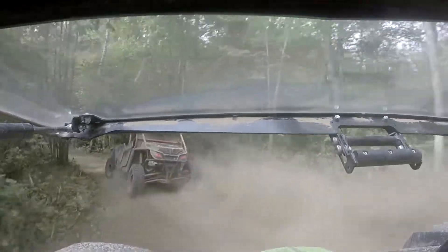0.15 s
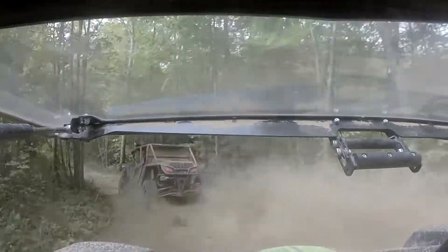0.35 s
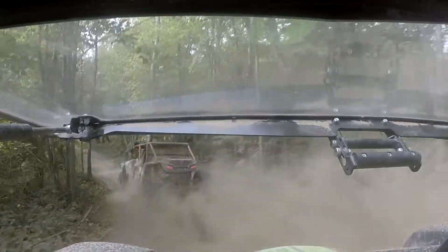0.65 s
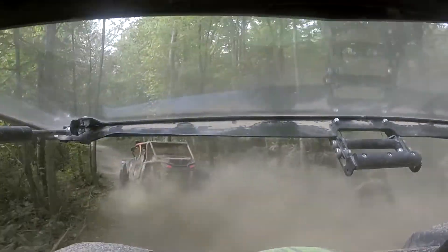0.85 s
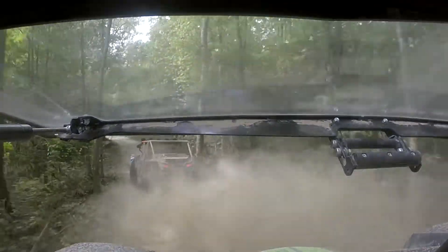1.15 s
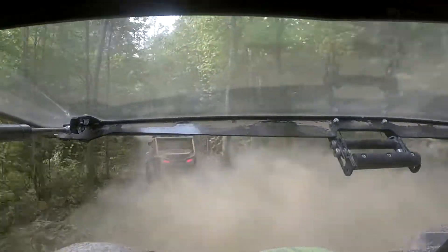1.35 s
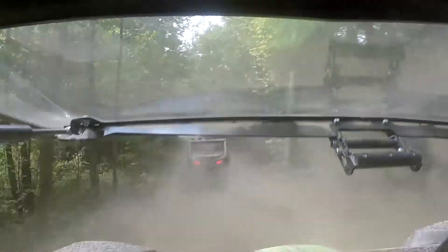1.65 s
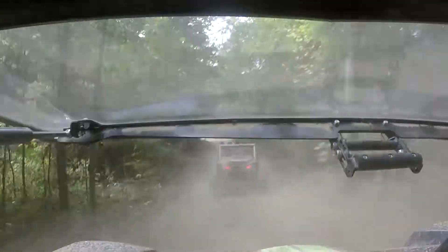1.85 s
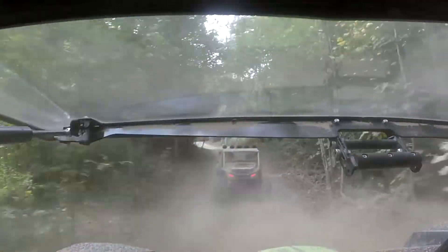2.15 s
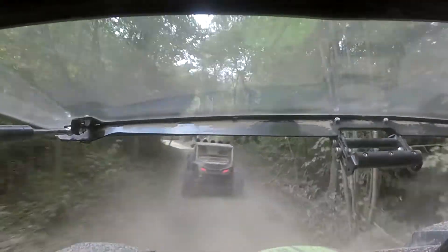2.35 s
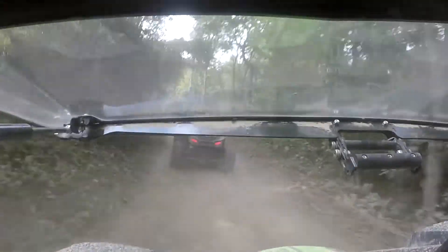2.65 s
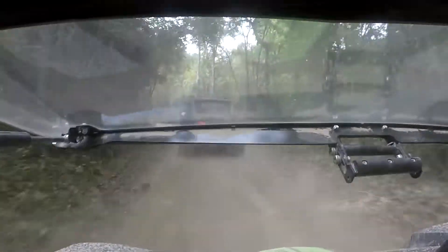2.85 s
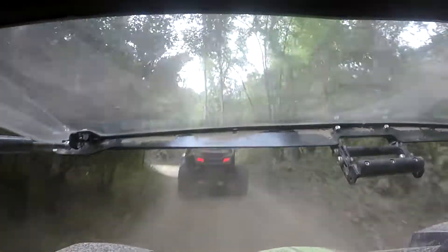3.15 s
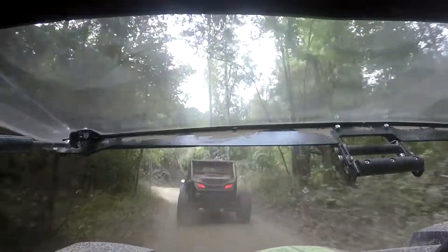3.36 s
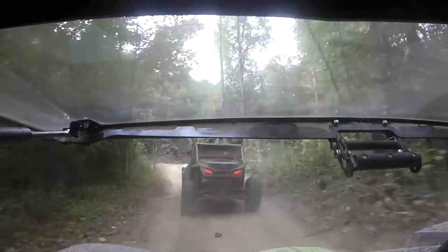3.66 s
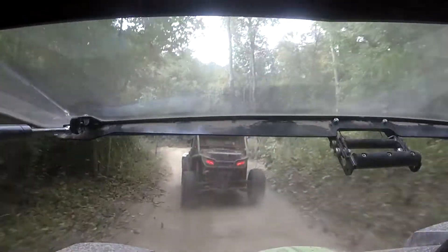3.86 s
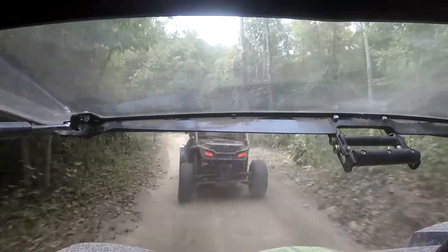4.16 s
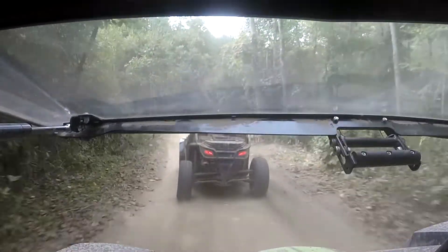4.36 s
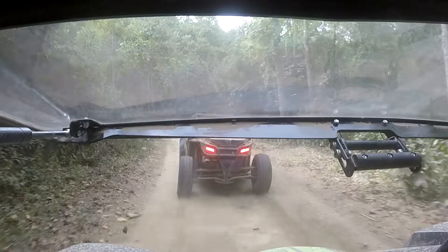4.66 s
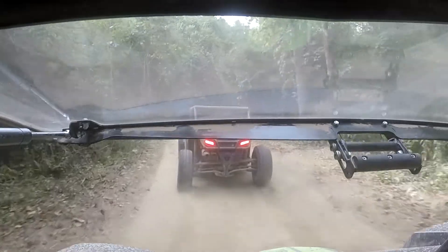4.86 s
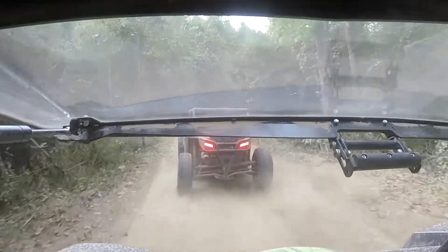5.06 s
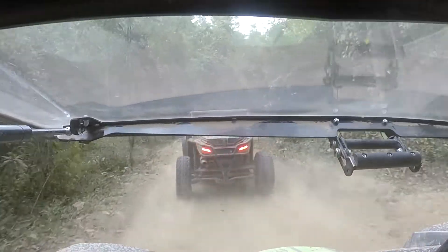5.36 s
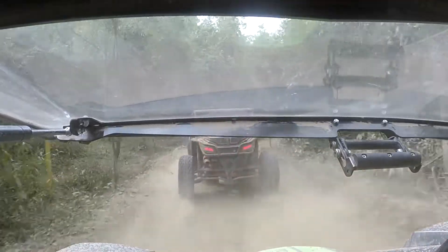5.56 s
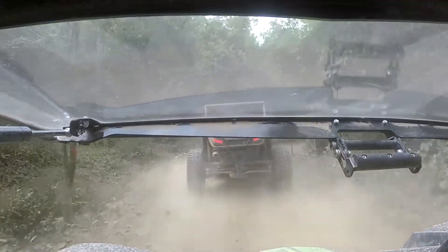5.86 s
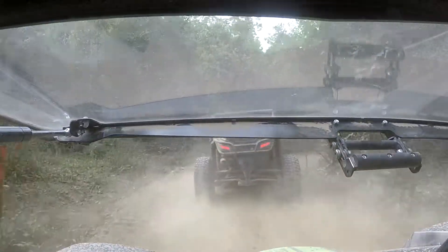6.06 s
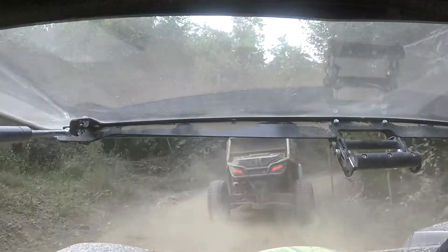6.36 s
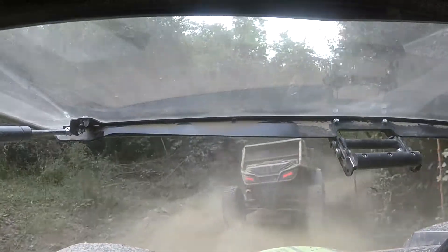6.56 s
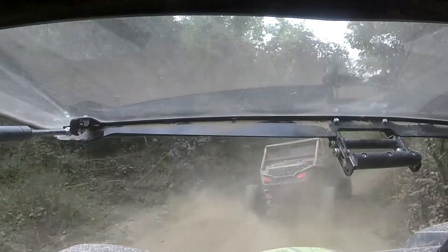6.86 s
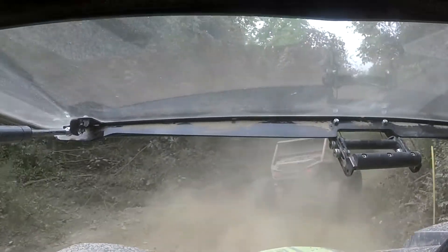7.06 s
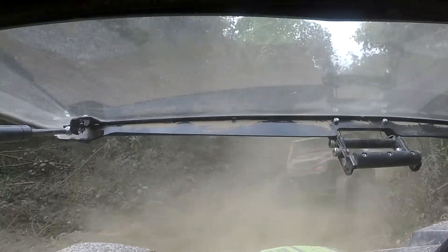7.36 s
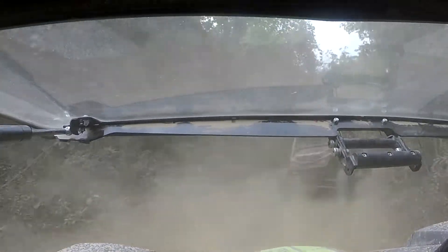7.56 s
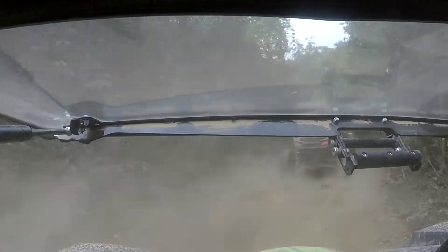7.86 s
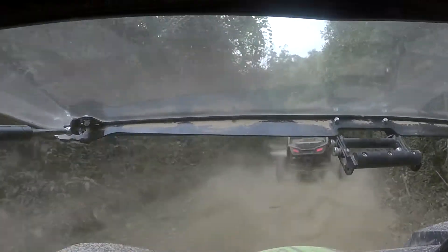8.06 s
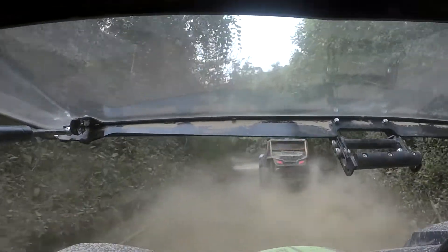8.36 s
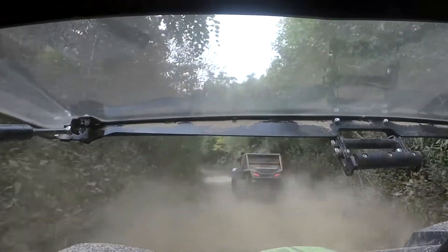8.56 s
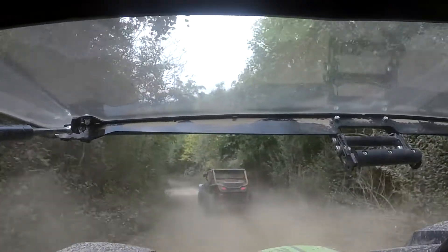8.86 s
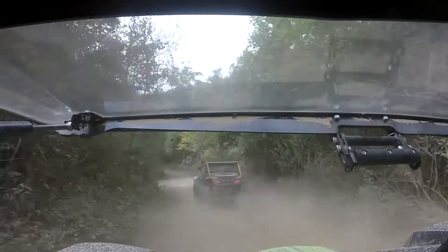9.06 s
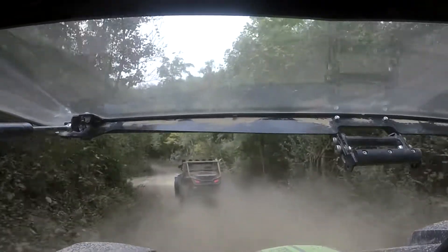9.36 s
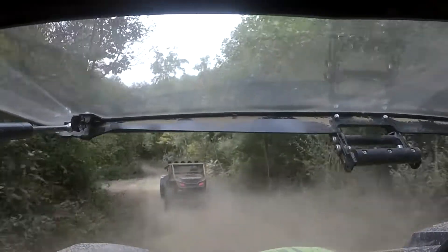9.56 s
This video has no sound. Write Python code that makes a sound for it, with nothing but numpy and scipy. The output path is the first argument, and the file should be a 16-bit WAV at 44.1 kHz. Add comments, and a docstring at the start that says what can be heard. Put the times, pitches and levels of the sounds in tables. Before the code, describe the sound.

Inside the hard, resonant cab of a side-by-side buggy on a rutted dirt trail. At first the twin engine growls unevenly, with the rasping exhaust of a buggy ahead fading after about 1.3 seconds. From 1.4 the engine climbs to a strong booming bark near 2 seconds, a loose fitting buzzing. At 2.6 the throttle shuts; revs fall and hard panel knocks clatter around 2.8. A short burst of revs peaks near 3.4, then sinks, with creaky chirps from 3.7 to 5.5 and heavier knocks at 4.3 and 4.5. The engine coasts to a lumpy, quiet low near 6.8. The leader rasps again from about 6.8 to 8.2, with a knock near 7.1; the engine recovers unevenly from 7, then pulls hard from 8.5, booming and buzzing to the end. Tyre crunch, belt whirr, low drone, bump thuds, latch clinks, stone ticks and rattles continue around it.

```python
"""Chasing a buggy along a dirt trail

Heard in a side-by-side buggy: two spells of hard throttle, with uneven throttle and a coast between.
Crank orders make the twin's boom and bark and the rasp of the buggy ahead; filtered noise makes the tyres
and belt drive. A low drone and thuds follow the bumps. Decaying noise bursts excite panels (knocks), a latch
(clinks) and hard trim (grit); loose parts ring as decaying sines, dry joints squeak as wavering ones, and
a fitting buzzes turn by turn. Cab resonances shape most of the broad sounds.
"""
import sys
import numpy as np
from scipy import signal
from scipy.fft import rfft, irfft
from scipy.io import wavfile
from scipy.ndimage import uniform_filter1d, minimum_filter1d

SR = 44100
rng = np.random.default_rng(int(sys.argv[2]) if len(sys.argv) > 2 else 0)


def bounce(signal):
    """Save signal as a 16-bit WAV file at the path given by the first command-line argument."""
    frames = np.transpose(np.atleast_2d(signal))
    limited = np.clip(frames, -1, 1)
    pcm = np.round(limited * 32767).astype(np.int16)
    wavfile.write(sys.argv[1], SR, pcm)


N = 427769
TIME = np.arange(N) / SR  # s
FREQ = np.arange(N // 2 + 1) * SR / N  # Hz

# Running noise. Each row: time in seconds, relative level of tyres on dirt in dB, of belt whirr in dB.
RUNNING_NOISE = [(0, -24.5, -42), (.8, -24.5, -42.5), (1.45, -23, -41), (2.3, -25, -42), (3.05, -27, -50.5),
                 (3.25, -21.5, -43), (3.85, -25, -45.5), (4.5, -28.5, -46.5), (5.2, -28, -49),
                 (6, -33, -49), (6.45, -30, -52), (6.65, -29, -46.5), (7.2, -30, -42), (8.2, -25, -43.5),
                 (8.55, -22, -41.5), (9.7, -25, -41)]
# Own engine. Each row: time in seconds, crank speed in Hz.
CRANK_SPEED = [(0, 88), (.15, 100.9), (.48, 107.1), (.65, 105.6), (.78, 95.7), (1.05, 101.8), (1.2, 97.4),
               (1.42, 110.5), (1.5, 117.2), (1.65, 129), (1.88, 139.8), (2.1, 137.5), (2.22, 136.1),
               (2.45, 129.6), (2.57, 135.5), (2.7, 106.9), (2.95, 97.8), (3.15, 111.5), (3.42, 117.9),
               (3.53, 105.1), (3.62, 100.9), (3.85, 93.3), (4.5, 78.25), (4.9, 72.3), (5.2, 70.28),
               (5.6, 65.92), (6.3, 60.26), (6.85, 53.55), (7.05, 57), (7.3, 72.85), (7.42, 78),
               (7.65, 84.36), (7.78, 78.04), (8, 98.54), (8.3, 101.9), (8.5, 116.9), (8.67, 129.9),
               (8.8, 134), (9.27, 138.2), (9.5, 135.8), (9.7, 136.3)]
# Spectrum of small hard impacts. Each row: frequency in Hz, relative gain in dB.
TICK_SPECTRUM = [(1000, -19.5), (3000, 10), (5000, 0.5), (6500, -1.5), (8300, -1.5), (10500, -8),
                 (12000, -16), (13500, -10), (14500, -22.5)]


def undb(db):
    """Level to amplitude ratio: 20 dB is a factor of ten."""
    return 10 ** (np.asarray(db) / 20)


def unit(x):
    """Normalisation to a root-mean-square of 1."""
    return x / np.sqrt(np.mean(x ** 2))


def steady(x):
    """Automatic gain: the short-term rms is held at 1 over an eighth of a second."""
    return x / np.sqrt(uniform_filter1d(x ** 2, SR // 8) + 1e-12)


def curves(table):
    """Linear interpolation of each column of a time table, sample by sample."""
    s, *columns = np.transpose(table)
    return [np.interp(TIME, s, column) for column in columns]


def slope(points):
    """Spectral envelope: gain through (Hz, dB) points on a log axis, falling steeply past both ends."""
    hz, db = np.transpose(points)
    below, above = (FREQ + 1) / hz[0], hz[-1] / (FREQ + 1)
    ends = np.minimum(1, np.minimum(below, above)) ** 4
    return undb(np.interp(np.log(FREQ + 1), np.log(hz), db)) * ends + 1e-7


def colour(x, gain):
    """Minimum-phase filtering: folding the cepstrum makes a causal response with the given gain."""
    size = 16384
    grid_hz = np.arange(size // 2 + 1) * SR / size
    cepstrum = irfft(np.log(np.interp(grid_hz, FREQ, gain)))
    cepstrum[1:size // 2] *= 2
    cepstrum[size // 2 + 1:] = 0
    response = irfft(np.exp(rfft(cepstrum)))
    return signal.fftconvolve(x, response)[:N]


def walk(rate):
    """Band-limited fluctuation of rms 1, drawn anew `rate` times a second and interpolated."""
    steps = rng.standard_normal(8192)
    return unit(np.interp(TIME * rate, np.arange(len(steps)), steps))


def noise():
    """White noise: equal power at every frequency."""
    return rng.standard_normal(N)


def swell(s, length):
    """Gaussian envelope centred on s, with `length` its full width at half height."""
    return .5 ** ((2 * (TIME - s) / length) ** 2)


def blow(s, t60, rise):
    """Impact excitation: a noise burst that swells quickly and decays by 60 dB in t60 seconds."""
    burst, start = np.zeros(N), int(s * SR)
    age = TIME[:min(SR // 2, N - start)]
    shape = (1 - np.exp(-age / rise)) * undb(-60 * age / t60)
    burst[start:start + len(age)] = shape * rng.standard_normal(len(age))
    return burst


def cab_response():
    """Room resonance: air and panels of the cab lift some bands and cancel others."""
    # Each row: centre in Hz, width at half the dB in Hz, gain in dB (negative for a notch).
    resonances = [(80.8, 16, 4), (96.4, 14, 4), (144.35, 17.5, 14.5), (203, 6.9, -13), (232.4, 38.3, 9.5),
                  (298.6, 41.7, 11.5), (387.8, 53, 8.5), (650, 88, 17), (703, 89, -8.5), (909, 107, 4.5),
                  (1076, 96, 7), (1505, 276, -3), (1646, 200, 11), (2020, 145, -8), (2245, 180, 5),
                  (4598, 233, 10), (5270, 300, -5)]
    return undb(sum(db * .5 ** ((2 * (FREQ - hz) / width) ** 2) for hz, width, db in resonances))


def exhaust(turns, hz, response, half_db, flutter_db, count):
    """Order synthesis of a four-stroke twin: unequal firings add half orders, and every order flutters."""
    out = 0
    for order in np.arange(2, count + 1) / 2:
        order_db = half_db * (order % 1 > 0) + flutter_db * walk(22)
        gain = np.interp(order * hz, FREQ, response) * undb(order_db)
        # the low orders start in phase and add up to one pulse every two turns;
        # reflections scatter the phases of the high ones
        phase = rng.random() * (order > 3)
        out = out + gain * np.cos(2 * np.pi * (order * turns + phase))
    return out


def level_swells():
    """Amplitude modulation: short rises and dips in the level of bark and intake boom, in dB."""
    # Each row: centre in seconds, length in seconds, change of bark in dB, change of intake boom in dB.
    level_changes = [(0.134, 0.13, -10, 1.5), (0.806, 0.3, -1.5, 1), (1.302, 0.31, 4.5, -11.5),
                     (3.38, 0.18, 0, -2), (3.698, 0.19, -2, -5), (3.892, 0.2, 6, -10),
                     (4.66, 0.083, 4.5, 6.5), (4.866, 0.083, 3.5, 3), (6.202, 0.28, 3.5, -10),
                     (7.92, 0.085, 1, 2.5), (8.167, .18, -4, 10), (8.84, 0.24, 4, -1)]
    return sum(np.outer([bark_db, boom_db], swell(s, length)) for s, length, bark_db, boom_db in level_changes)


def engine(hz, throttle, cab):
    """Forced resonance: orders crossing the intake resonance boom; the exhaust barks, ragged at low revs."""
    # Each row: frequency in Hz, relative gain in dB.
    bark_spectrum = [(170, 2.5), (205, -3.5), (268, 8.5), (300, -4), (400, -3.5), (540, -9.5), (680, -28),
                     (1000, -18.5), (1350, -27), (1620, -19), (1850, -32), (2500, -57.5)]
    intake = slope([(60, -20.0), (95, -8.0), (128, 5.0), (148, 0.5), (175, -8.5), (260, -56.5)])
    cruise_hz = 100
    # relative boom at cruising revs and full throttle; change with throttle shut; change per octave of revs
    boom_base_db, boom_shut_db, boom_octave_db = -16.5, -26.5, -4
    # bark at low revs and full throttle; change with throttle shut; gain when revving hard
    bark_base_db, bark_shut_db, bark_revving_db = -24.5, -5.5, 7.5

    revving = np.clip((hz - 105) / 22, 0, 1)
    ragged = 1 - revving
    # at low revs the two cylinders pull unequally
    lumpy = np.clip((100 - hz) / 30, 0, 1)
    shut = 1 - throttle
    boom_db = boom_base_db + boom_shut_db * shut + boom_octave_db * np.log2(hz / cruise_hz)
    bark_db = bark_base_db + bark_shut_db * shut + bark_revving_db * revving * throttle

    jitter = (.001 + .001 * ragged) * walk(70) + .002 * ragged * walk(9)
    turns = np.cumsum(hz * (1 + jitter)) / SR
    boom = exhaust(turns, hz, intake, half_db=0.0, flutter_db=1.9 + 1.3 * ragged, count=6)
    bark = steady(exhaust(turns, hz, cab * slope(bark_spectrum), half_db=-13.5 + 7.9 * lumpy,
                          flutter_db=1.7 + 0.84 * ragged, count=36))

    # no two firings are equally strong
    strength = undb(.6 * ragged * walk(110))
    bark_swell_db, boom_swell_db = level_swells()
    boom = boom * undb(boom_db + boom_swell_db)
    bark = bark * undb(bark_db + bark_swell_db)
    return strength * (boom + bark), turns


def buggy_ahead(cab):
    """Harmonic radiation: the leader's exhaust orders rasp back along the trail as it pulls away."""
    # Each row: time in seconds, crank speed in Hz.
    leader_speed = [(0, 103.5), (.26, 103.9), (.39, 105.9), (.5, 105.4), (.78, 107), (.95, 104.3),
                    (1.12, 106.2), (1.25, 103.4), (1.8, 108.1), (6.45, 78.02), (6.6, 83.06), (6.75, 90.3),
                    (6.9, 94), (7.1, 94.46), (7.22, 97.6), (7.42, 96.65), (7.57, 98.8), (7.72, 95.5),
                    (7.82, 98.5), (7.93, 95.7), (8.8, 103.1)]
    # Each row: start of pulling away in seconds, end in seconds.
    pulls = [(0, 1.28), (6.88, 8.12)]
    # Each row: frequency in Hz, relative gain in dB.
    pipe_spectrum = [(280, -9.5), (345, 5.5), (400, 3), (520, 5.5), (650, -4), (780, -4.5), (845, 7.5),
                     (880, 1.5), (925, 8.5), (1060, -4), (1250, 2), (1370, 8), (1520, -9), (1650, -25.5),
                     (2500, -35)]
    level_db, rise_db_per_s, fall_db_per_s = -30.5, 31.5, 29

    hz, = curves(leader_speed)
    pulling = 0
    for start, end in pulls:
        before, after = np.maximum(start - TIME, 0), np.maximum(TIME - end, 0)
        pulling = pulling + undb(-rise_db_per_s * before - fall_db_per_s * after)
    turns = np.cumsum(hz * (1 + .001 * walk(50))) / SR
    pipe = exhaust(turns, hz, cab * slope(pipe_spectrum), half_db=-3.0, flutter_db=2.1, count=36)
    uneven = undb(.7 * walk(100) + 1.1 * walk(12))
    return steady(pipe) * uneven * pulling * undb(level_db)


def jolt(s, t60):
    """Transient response to a bump: it builds as the wheel climbs, then decays exponentially."""
    rise_s = 0.08
    climb = np.clip(1 + (TIME - s) / rise_s, 0, 1)
    return climb * undb(-60 * np.maximum(TIME - s, 0) / t60)


def ride():
    """Power summation: steady shaking from the ruts and a jolt per bump set body heave and tyre thud."""
    # Each row: time in seconds, mean level of the steady shaking in dB.
    ruts = [(0, -25), (1.25, -19.5), (1.7, -27.5), (2.2, -25.5), (2.7, -22.5), (4.3, -22.5), (4.8, -21),
            (6.2, -21.5), (6.5, -21), (8.3, -25), (8.7, -25.5), (9.7, -25.5)]
    # Each row: time in seconds, level of body heave in dB, of tyre thud in dB.
    bumps = [(.13, -11.5, -14.5), (.27, -10.5, -32), (.6, -9, -25), (.78, -17, -17.5), (1.16, -14.5, -23),
             (1.5, -9, -33), (1.68, -12, -37), (2.48, -12.5, -24), (2.88, -17, -27), (3.24, -15.5, -32),
             (3.52, -13, -35), (3.73, -14, -14), (4.28, -13.5, -16), (4.54, -30, -17), (6.96, -21, -35),
             (7.07, -28, -13.5), (7.32, -25, -20), (7.62, -14.5, -29), (8.2, -15, -19.5),
             (8.4, -9.5, -17.5), (9.38, -16, -31), (9.6, -14, -33)]
    heave_t60_s, thud_t60_s = 1.7, 0.56

    ruts_db, = curves(ruts)
    heave = undb(ruts_db - 3 * walk(3.6))
    thud = undb(ruts_db + 0.5 * walk(19))
    for s, heave_db, thud_db in bumps:
        heave = np.hypot(heave, undb(heave_db) * jolt(s, heave_t60_s))
        thud = np.hypot(thud, undb(thud_db) * jolt(s, thud_t60_s))
    return heave, thud


def trail(cab):
    """Rolling excitation: the body drones at its lowest resonance; tyres thud over ruts and crunch dirt."""
    # Spectra. Each row: frequency in Hz, relative gain in dB.
    heave_spectrum = [(15, -28), (24, -7), (33, 24.5), (44, 23.5), (56, -4), (90, -34)]
    thud_spectrum = [(40, -16.5), (60, 1), (85, 1.5), (120, -10), (170, -10.5), (260, -20)]
    dirt_spectrum = [(100, -22), (150, 6.5), (300, 1), (500, 3), (650, -9.5), (800, -3.5), (1100, -6.5),
                     (1500, -14), (2300, -16.5), (3200, -28.5), (6000, -47)]

    heaving, thudding = ride()
    dirt_db, _ = curves(RUNNING_NOISE)
    body_hz = 31 + 2.83 * walk(14)
    drone = np.sin(2 * np.pi * np.cumsum(body_hz) / SR)
    rumble = unit(colour(noise(), slope(heave_spectrum)))
    heave = steady(drone + .5 * rumble) * heaving
    thud = steady(colour(noise(), cab * slope(thud_spectrum))) * thudding
    grains = noise() * undb(2.3 * walk(25) + 0.5 * walk(260))
    crunch = unit(colour(grains, cab * slope(dirt_spectrum))) * undb(dirt_db + 1.33)
    return heave + thud + crunch


def belt_drive(turns, cab):
    """Amplitude modulation: belt, gears and valves whirr as noise pulsing with each turn of the crank."""
    # Each row: frequency in Hz, relative gain in dB.
    whirr_spectrum = [(600, 7.5), (900, 10.5), (1600, 9), (2400, 4), (3100, 2), (4100, -6.5), (6300, -10),
                      (8300, -15.5), (10000, -24.5), (11500, -32), (14000, -41)]
    _, whirr_db = curves(RUNNING_NOISE)
    rub = noise() * (1 + 0.17 * np.cos(2 * np.pi * turns)) * undb(1.13 * walk(35))
    # reflections between the hard panels ripple the treble, here by random gains 90 Hz apart
    ripple_db = 1.8 * np.interp(FREQ, np.arange(256) * 90, rng.standard_normal(256))
    ripple = undb(ripple_db * (FREQ > 2500))
    return unit(colour(rub, cab * ripple * slope(whirr_spectrum))) * undb(whirr_db + 7)


def rattles():
    """Free vibration: tapped loose parts ring and decay, louder with tyre noise and near a critical speed."""
    # Each row: pitch in Hz, 60 dB decay time in seconds, relative level in dB.
    parts = [(609, 0.064, -10.5), (657.4, 0.078, -10), (1082, .04, -13.5), (1670, 0.047, -14)]
    taps_per_s, detune_share, scatter_db, fits_db = 55, 0.029, 2.8, 1.5
    # crank speed that shakes the parts most, width of that resonance, gain at its centre
    shake_hz, shake_width_hz, shake_db = 120.4, 12, 3.3

    dirt_db, _ = curves(RUNNING_NOISE)
    revs, = curves(CRANK_SPEED)
    drive_db = dirt_db + shake_db * .5 ** ((2 * (revs - shake_hz) / shake_width_hz) ** 2)
    age, out = TIME[:SR // 16], 0
    for hz, t60, db in parts:
        part = np.zeros(N + len(age))
        starts = rng.integers(0, N, int(taps_per_s * N / SR))
        for start in starts:
            detune, size = rng.standard_normal(2)
            ring = np.sin(2 * np.pi * hz * (1 + detune_share * detune) * age)
            part[start:start + len(age)] += ring * undb(scatter_db * size - 60 * age / t60)
        out = out + unit(part[:N] * undb(fits_db * walk(9))) * undb(db)
    return out * undb(drive_db - 4.5)


def squeaks():
    """Stick-slip friction: dry joints chirp or creak at a fluctuating pitch as the frame twists."""
    # Each row: centre in seconds, pitch in Hz, mean level in dB, length in seconds, rms pitch scatter in Hz.
    stick_slips = [(0.176, 2120, -37, 0.036, 40), (2.647, 2150, -34, 0.011, 70),
                   (2.71, 2290, -43, 0.11, 80), (2.914, 2290, -39, 0.078, 90),
                   (3.116, 2290, -37, .015, 132), (3.142, 6950, -47, 0.021, 70),
                   (3.683, 9460, -47, 0.036, 70), (3.72, 1140, -26.5, 0.04, 35),
                   (3.788, 1185, -28, 0.053, 35.3), (3.897, 1087, -27, 0.063, 34.97),
                   (4.24, 1120, -29, .03, 35), (4.273, 2350, -34, 0.036, 169),
                   (4.482, 2330, -32, 0.018, 81), (4.738, 1137, -29, 0.02, 35),
                   (5.01, 1117, -33, 0.056, 44.96), (5.191, 1114, -29, 0.056, 39.68),
                   (5.344, 2295, -36, 0.041, 170), (5.47, 1064, -33, .09, 24.98),
                   (7.126, 2289, -34, 0.021, 70), (8.17, 2260, -37, 0.09, 90),
                   (9.218, 9405, -53, 0.038, 70)]
    waver = np.cumsum(walk(700)) / SR
    out = 0
    for s, hz, db, length, scatter_hz in stick_slips:
        tone = np.sin(2 * np.pi * (hz * TIME + scatter_hz * waver))
        out = out + undb(db) * swell(s, length) * tone
    return out * undb(2.85 * walk(200))


def knocks(cab):
    """Dispersion: suspension blows ring the panels, whose bending waves bring the highs first."""
    # Each row: time in seconds, relative strength in dB, 60 dB decay time of the chatter in seconds,
    # brightness in dB per octave, rise time constant in seconds.
    strikes = [(.367, -12, 0.14, -1.5, .003), (1.146, -9, 0.11, -5, .001), (2.817, -4, 0.032, 3.5, .0005),
               (2.82, 1, 0.13, -2, 0.0011), (2.907, -4, .13, -5, .003), (2.936, -10.5, .08, -7, .002),
               (3.02, -12, .08, -2, .005), (3.452, -17, 0.051, -3, .002), (3.613, -7, .07, -8, .002),
               (4.119, -9, 0.043, -9, .0005), (4.139, -9, 0.078, -7.5, .002),
               (4.266, -4.5, 0.094, -3.5, 0.0023), (4.281, -4, 0.12, -6, .0027),
               (4.492, -5.5, 0.045, 3, 0.0025), (4.497, 1.5, 0.13, -4, 0.0014), (5.96, -15.5, .1, -6, .003),
               (6.599, -11, 0.32, -0.5, 0.018), (7.068, -7.5, 0.11, -13, .005),
               (7.127, -5, 0.16, -4, 0.0098)]
    # Each row: frequency in Hz, relative gain in dB.
    panel_spectrum = [(100, -24), (200, 4.5), (330, -5.5), (550, 8.5), (800, 3.5), (1200, 0.5), (1650, -3),
                      (1950, -8), (2500, -23), (3000, -39.5)]
    contact_gain, chatter_db, spread_s = 10.5, -4.5, 0.00899

    panels = cab * slope(panel_spectrum)
    octaves = np.log2(np.clip(FREQ, 200, 3000) / 650)
    out = 0
    for s, db, t60, bright_db, rise in strikes:
        contact = contact_gain * signal.unit_impulse(N, int(s * SR))
        push = contact + undb(chatter_db) * blow(s, t60, rise)
        out = out + undb(db) * colour(push, unit(panels * undb(bright_db * octaves)))
    # the delay grows toward the lows; summed over frequency it gives the phase
    late_s = spread_s * np.maximum(np.sqrt(650 / np.maximum(FREQ, 150)) - .6, 0)
    lag = np.exp(-2j * np.pi * np.cumsum(late_s) * SR / N)
    return undb(-6.0) * irfft(rfft(out) * lag, N)


def clinks():
    """Modal resonance: the windscreen latch jumps in its catch and a few metal modes colour each blow."""
    # Each row: time in seconds, relative strength in dB.
    jumps = [(0.411, -26), (0.455, -24.5), (1.147, -22.5), (3.018, -39), (3.565, -29.5), (4.712, -29.5),
             (4.733, -36), (6.26, -36.5), (6.316, -42), (6.597, -29.5), (7.117, -29), (8.478, -27),
             (8.582, -27), (8.629, -23)]
    # Each row: mode frequency in Hz, width at half amplitude in Hz, relative gain in dB.
    latch_modes = [(1160, 78, -5.5), (1645, 130, 4), (1760, 74, -14), (2270, 100, -11)]
    blows = sum(undb(db) * blow(s, t60=0.097, rise=.0003) for s, db in jumps)
    modes = sum(undb(db) / (1 + (2 * (FREQ - hz) / width) ** 2) for hz, width, db in latch_modes)
    return undb(1.5) * colour(blows, unit(modes))


def grit():
    """Brief impact: small stones tick against the body with a bright, short spectrum."""
    # Each row: time in seconds, relative strength in dB.
    stones = [(1.2727, -40), (2.77, -44), (2.8874, -40), (3.4938, -42), (3.7846, -39), (3.93, -44),
              (4.0155, -43), (4.316, -40.5), (4.548, -38), (4.5637, -38), (4.69, -45), (4.9, -45),
              (5.3899, -42), (8.405, -45)]
    blows = sum(undb(db) * blow(s, t60=0.023, rise=.0015) for s, db in stones)
    return undb(6.0) * colour(blows, unit(slope(TICK_SPECTRUM)))


def buzz(turns):
    """Periodic impact: in fits, a loose fitting hits its stop once a turn, sometimes hard, sometimes barely."""
    # Each row: centre in seconds, length in seconds, relative level in dB.
    buzz_fits = [(1.81, 0.021, -39), (1.944, 0.035, -35), (2.059, .035, -37), (2.202, .04, -33),
                 (2.26, 0.044, -35), (2.324, 0.023, -38), (2.377, 0.015, -33), (2.519, 0.13, -37.5),
                 (8.89, .04, -36), (8.987, 0.097, -35), (9.099, .04, -34), (9.191, .045, -33.5),
                 (9.345, .09, -36), (9.6, 0.24, -40.5)]
    fits = sum(undb(db) * swell(s, length) for s, length, db in buzz_fits)
    taps = np.diff(np.floor(turns), prepend=0) * rng.uniform(0.1, 1.1, N)
    decay = np.exp(-TIME[:SR // 50] / 0.0025)
    scrape = signal.fftconvolve(taps * fits, decay)[:N] * noise()
    return colour(scrape, unit(slope(TICK_SPECTRUM)))


def scene():
    """Superposition: the pressures of all sources add in the cab."""
    # The driver's foot. Each row: time in seconds, throttle opening from 0 to 1.
    foot = [(0, 1), (.3, 0.18), (.8, 0.89), (1.25, 0.76), (1.52, 0.9), (2.55, 0.91), (2.6, 0), (3.05, 0.16),
            (3.2, 0.6), (3.85, 0.73), (4.1, 0.25), (4.55, 0.51), (4.88, 0.68), (5.7, 0), (6.95, 0),
            (7.35, 0.2), (7.6, 0.93), (7.76, 0.53), (7.9, 0.89), (8.25, 0.48), (8.7, 0.96), (9.35, 0.97),
            (9.7, 0.84)]
    cab = cab_response()
    hz, = curves(CRANK_SPEED)
    throttle = np.clip(curves(foot)[0], 0, 1)
    motor, turns = engine(hz, throttle, cab)
    machine = motor + belt_drive(turns, cab) + buzz(turns)
    chassis = rattles() + squeaks() + knocks(cab) + clinks() + grit()
    return (machine + buggy_ahead(cab) + trail(cab) + chassis)[None]


def record(dry):
    """Peak limiting and low-pass filtering: smoothed gain dips tame the peaks, and the top is cut."""
    hold, ceiling, top_hz = SR // 200, .88, 15200  # samples, amplitude, Hz
    gain = minimum_filter1d(ceiling / np.maximum(np.abs(dry), ceiling), hold)
    gain = uniform_filter1d(uniform_filter1d(gain, hold // 2), hold // 2)
    # 5 ms fades at both ends
    fade = np.minimum(np.minimum(TIME, TIME[::-1]) * SR / hold, 1)
    low_pass = signal.ellip(8, .2, 70, top_hz, fs=SR, output="sos")
    return signal.sosfilt(low_pass, dry * gain * fade)


dry = scene()
out = record(dry)
bounce(out)
```